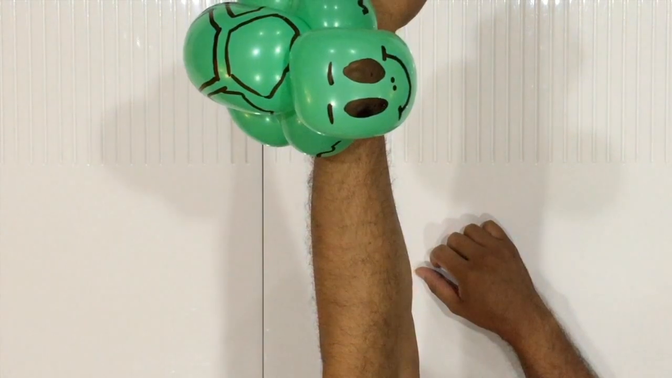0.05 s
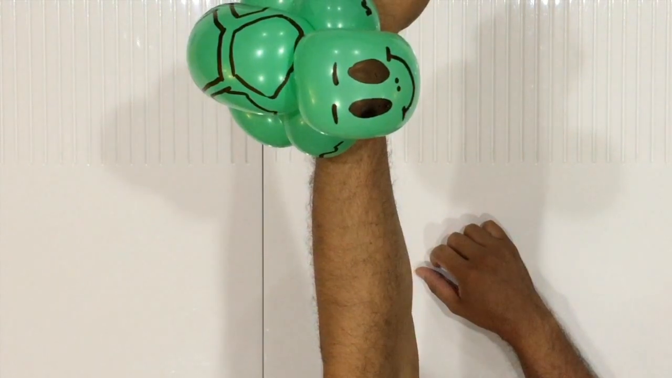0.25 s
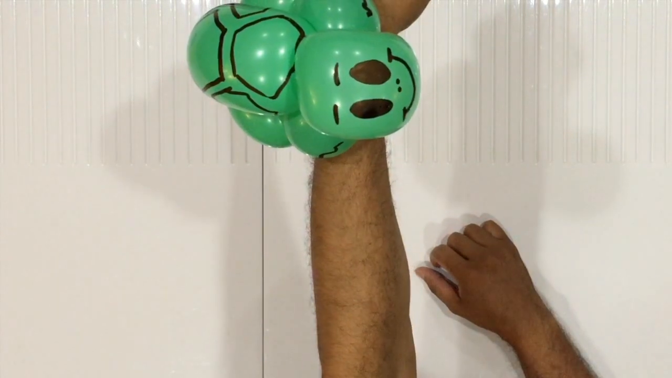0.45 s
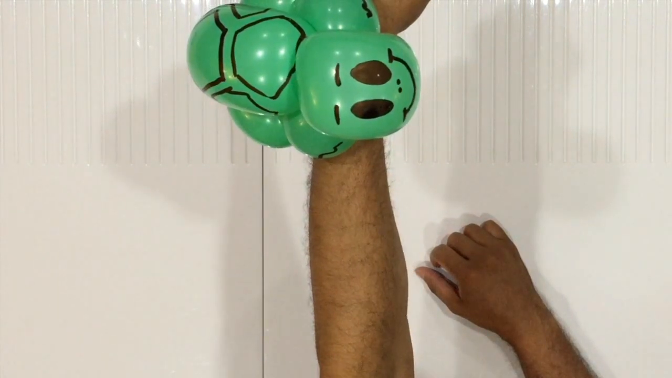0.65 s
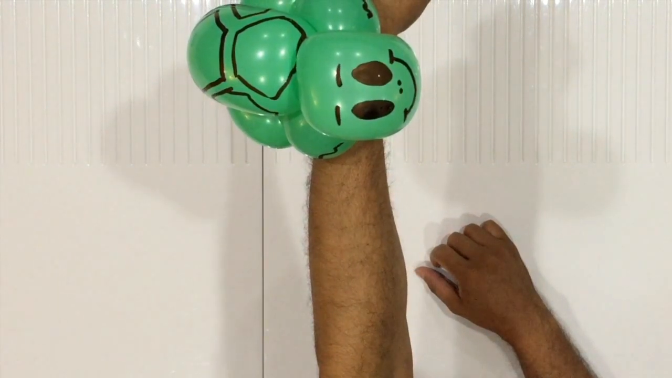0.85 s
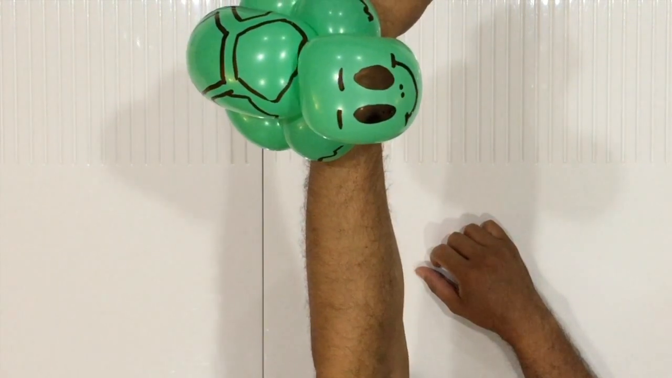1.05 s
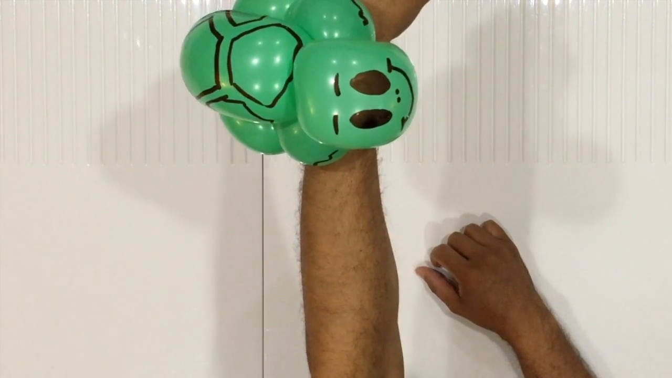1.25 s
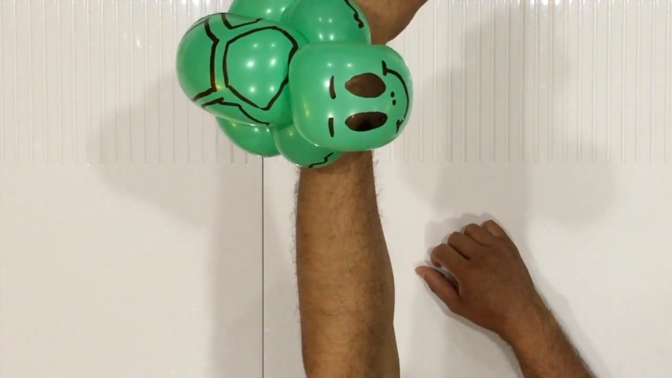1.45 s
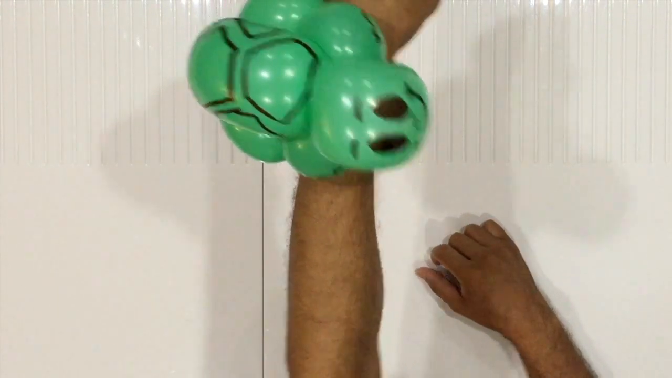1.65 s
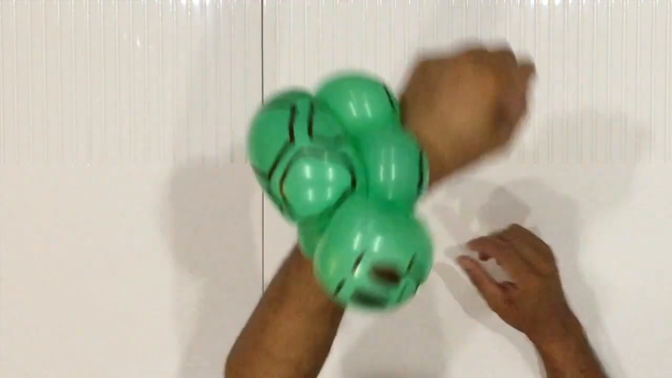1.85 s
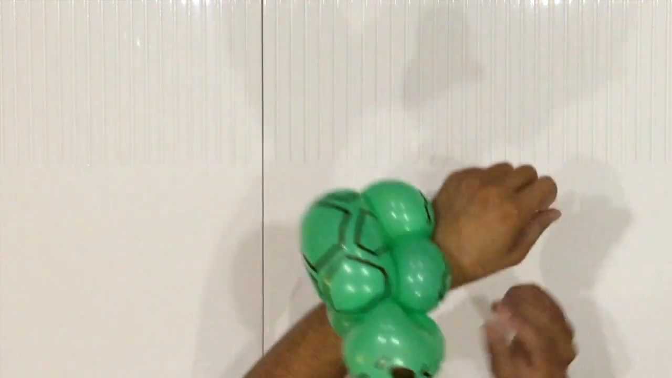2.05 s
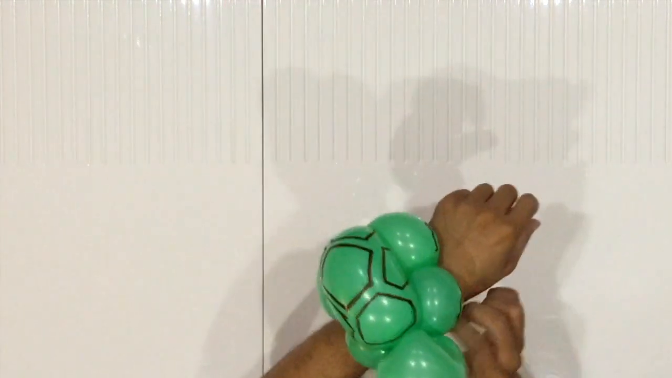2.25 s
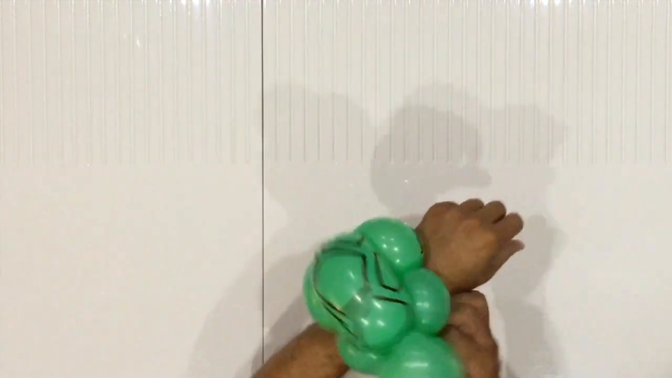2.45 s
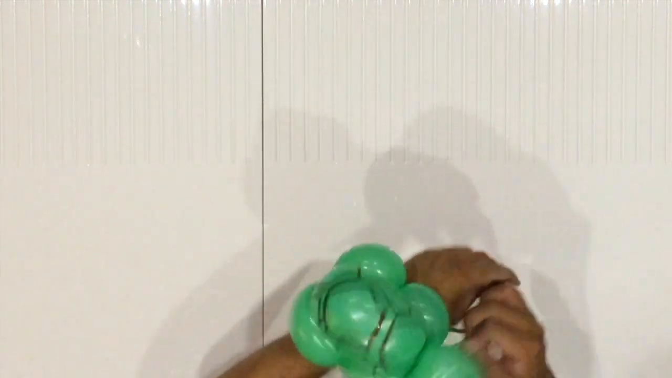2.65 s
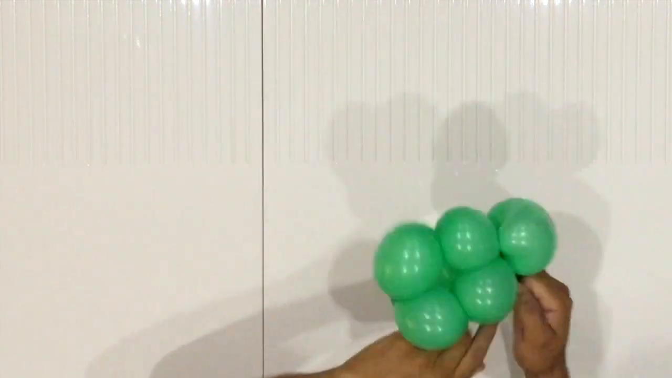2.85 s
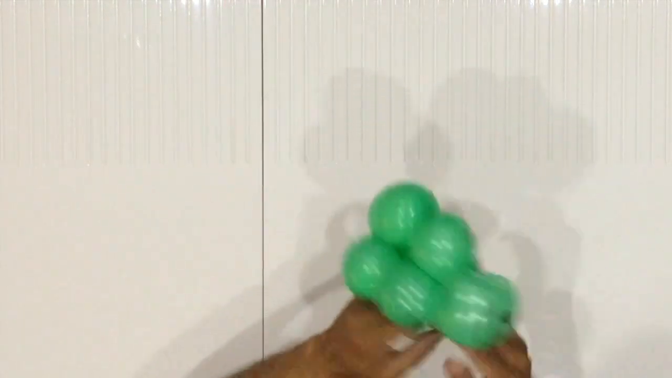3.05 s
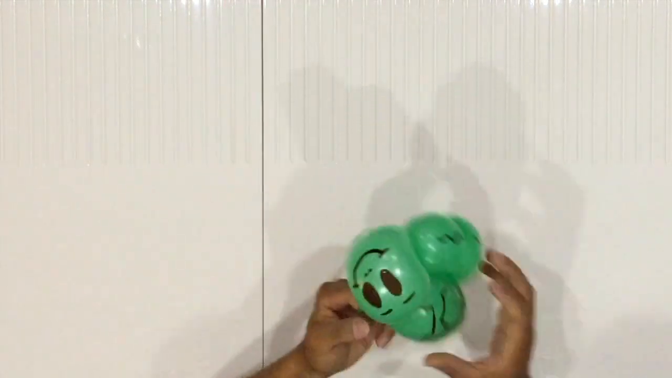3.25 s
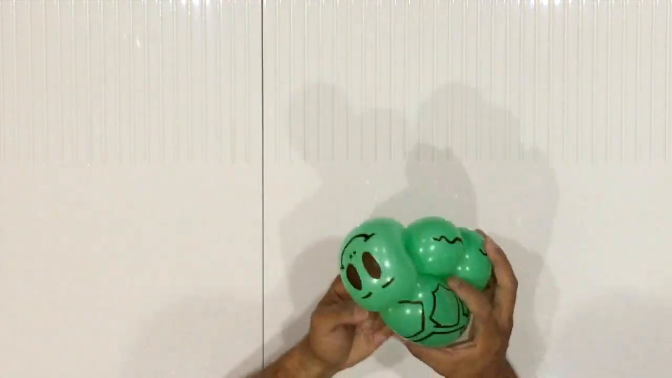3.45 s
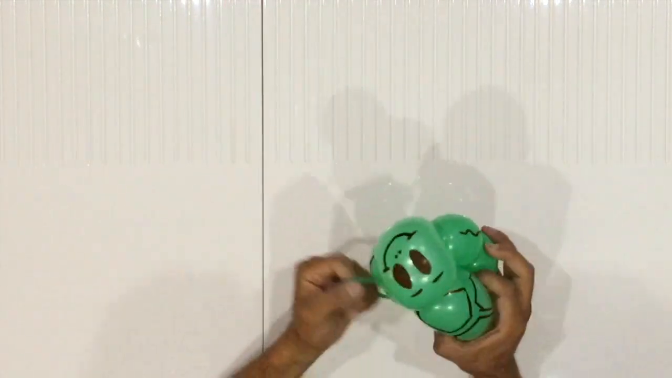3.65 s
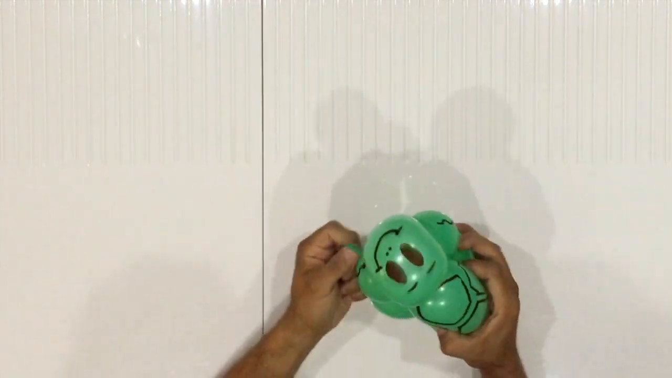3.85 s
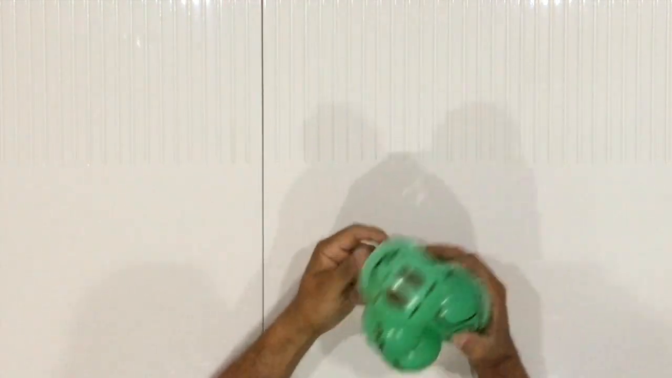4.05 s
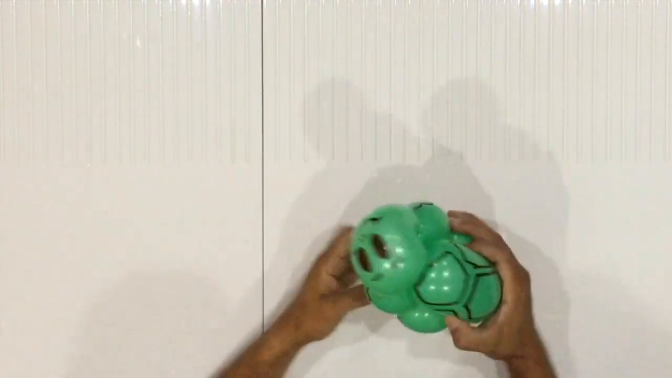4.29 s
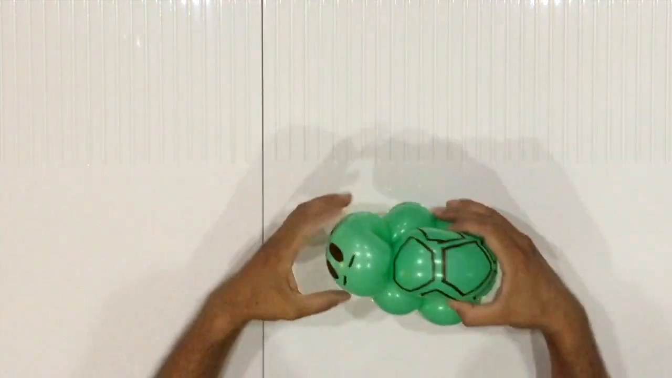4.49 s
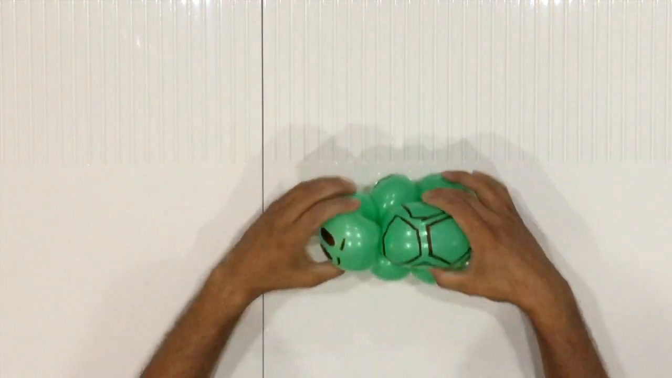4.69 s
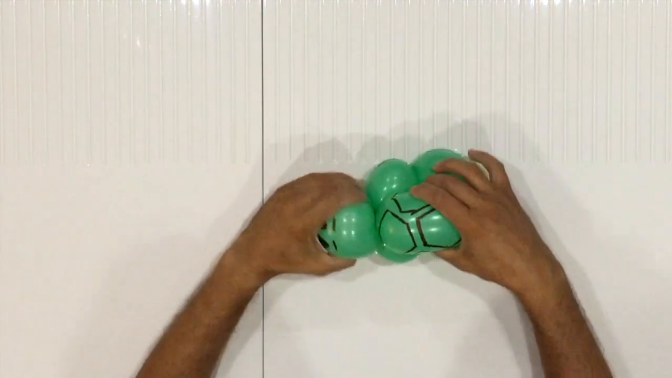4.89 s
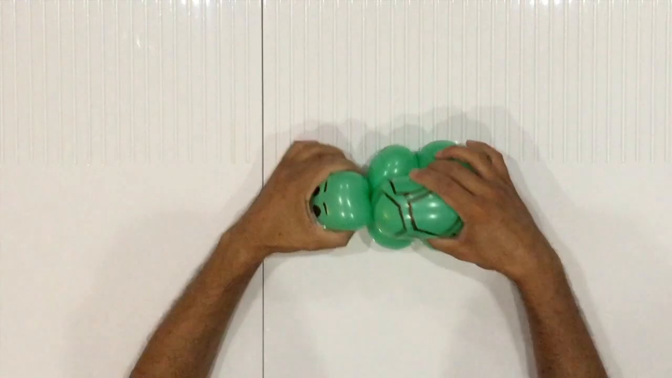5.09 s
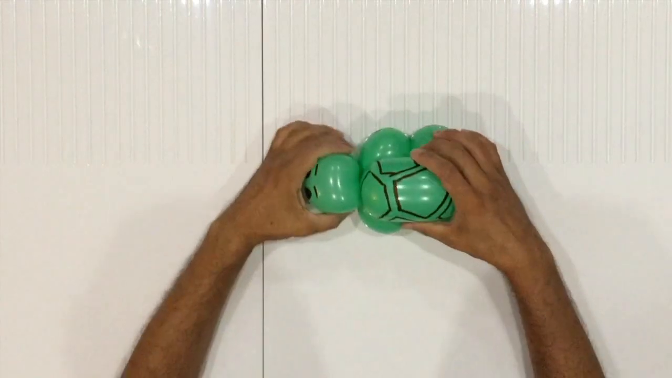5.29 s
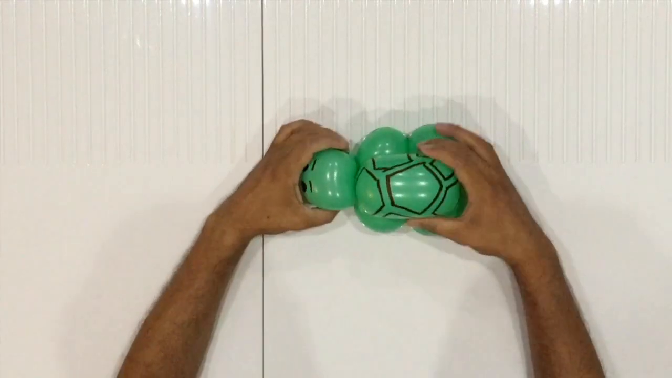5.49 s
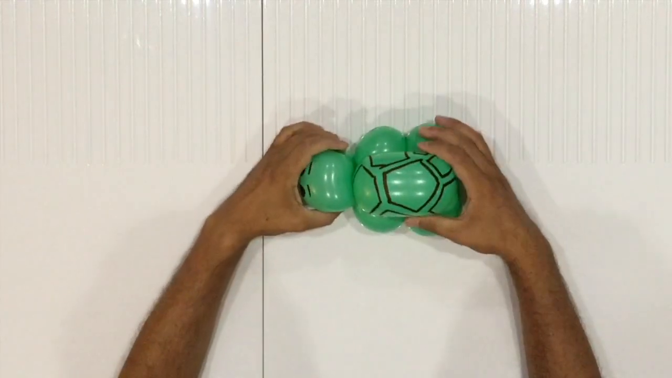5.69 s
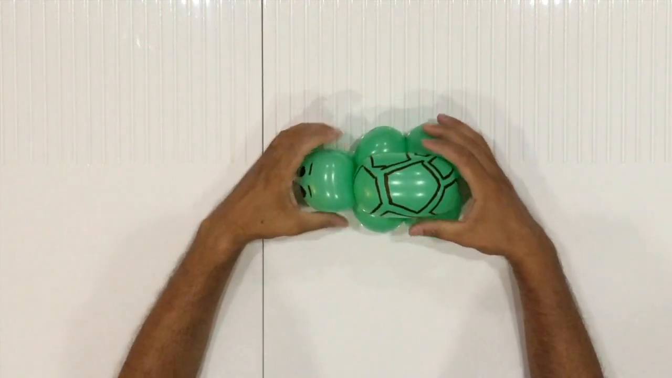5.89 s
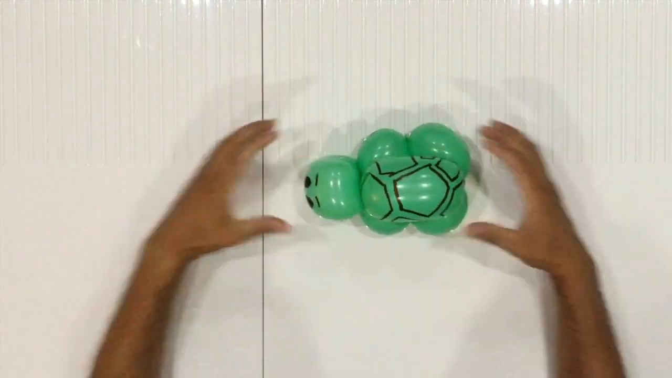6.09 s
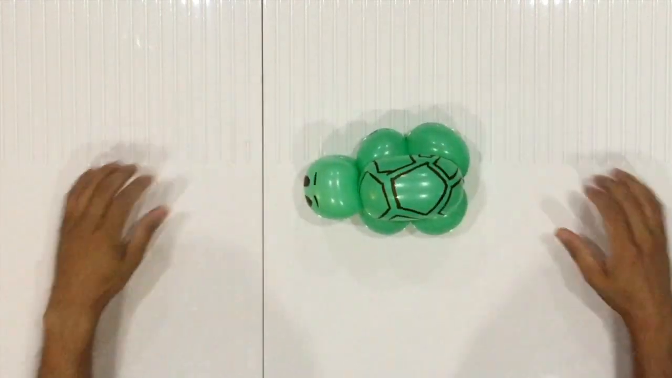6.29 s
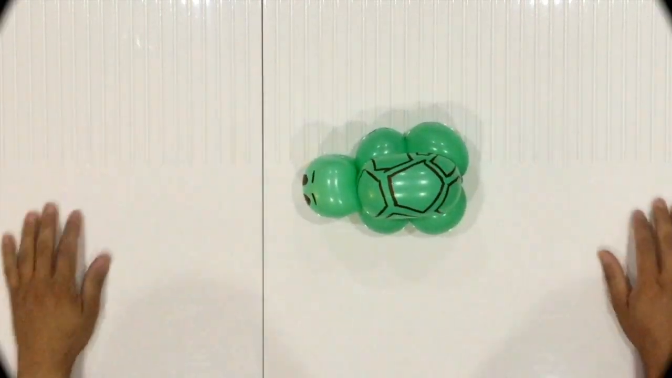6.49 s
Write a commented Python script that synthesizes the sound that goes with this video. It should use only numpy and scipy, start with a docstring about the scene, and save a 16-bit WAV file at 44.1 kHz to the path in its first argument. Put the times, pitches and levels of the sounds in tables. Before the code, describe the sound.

For the first 2.3 seconds there is only quiet room air with a low restless rumble, faint electrical hum and a very thin high whine. Then hands pull a latex balloon figure off a wrist: short, dry, stuttering rubs with hiss and crackle, growing busy from 2.5 to 3.1, with sharp pops around 2.7 and 2.9. It drops to faint touches near 3.3, then groaning, rasping strokes and small snaps build from 3.6. At about 3.99 one hard, hollow snap stands out as the loudest moment, followed by softer rubbing and a smaller pop at 4.35. After a quieter slide, a strong rub at 4.9 leads into brief, rough, mid-pitched squeaks, mostly rising, until 5.3. Another firm rub and squeak come near 5.55, then light touches end around 5.9, leaving room tone. Short, bright echoes of a small hard room surround the close handling.

```python
"""Quiet air, hum and a thin whine fill a small bare room, made from coloured noise and sine waves.
From 2.3 s a twisted latex balloon figure is pulled off a wrist and turned over: skin sticks and slips,
made of uneven kicks and noise; now and then the lobes snap past each other, hardest near 4 s (noise bursts).
Both hands close round it by 4.85 s; from then on short squeaks of nearly regular slips join the rubbing.
It is set down with the last light touches near 5.9 s. Echoes surround all sounds of the balloon."""
import sys
import numpy as np
from scipy import signal
from scipy.fft import rfft, irfft
from scipy.io import wavfile
from scipy.ndimage import uniform_filter1d

SR = 44100
rng = np.random.default_rng(int(sys.argv[2]) if len(sys.argv) > 2 else 0)


def store_wav(level_fs):
    """Save 16-bit WAV to argv[1]."""
    pcm = np.round(np.clip(np.atleast_2d(level_fs), -1, 1) * 32767)
    wavfile.write(sys.argv[1], SR, pcm.T.astype(np.int16))


N = 287967  # length of the scene in samples


def amp(db):
    """Decibels to gain."""
    return 10 ** (np.asarray(db) / 20)


def evened(x):
    """Scales a sound to an average strength (rms) of 1."""
    return x / np.sqrt(np.mean(x ** 2) + 1e-20)


def read(points, hz):
    """Reads a table between its points, on a log-frequency axis."""
    f, value = np.transpose(points)
    return np.interp(np.log(hz + 1), np.log(f + 1), value)


def drift(per_s):
    """Smooth random wandering of rms 1; a higher per_s wanders faster."""
    step = SR / (2 * per_s)
    knots = signal.resample_poly(rng.standard_normal(int(N / step) + 4), 8, 1)
    return evened(np.interp(np.arange(N) / step * 8, np.arange(len(knots)), knots))


# colour of the still room air: (f/Hz, relative level per Hz/dB)
AIR_COLOUR = [(24, -34), (40, -1.5), (120, -5.5), (150, -3), (235, -3.5), (266, -10), (294, -2.5),
              (368, -14), (438, -12.5), (472, -15.5), (606, -16), (2270, -26), (2920, -25), (4920, -32),
              (6000, -31.5), (8000, -36), (15500, -39.5)]
# faint electrical hum, before its level wavers: (f/Hz, level/dB)
HUM_TONES = [(96.9, -74.5), (199.2, -80), (290.7, -86.5), (613.7, -87)]
# thin electrical whine, before its level wavers: (f/Hz, level/dB)
WHINE_TONES = [(2945, -85.5), (3230, -94), (3488, -91)]


def background():
    """Soft air noise with a restless rumble, plus hum and whine whose level and phase waver."""
    hz, t = np.fft.rfftfreq(N, 1 / SR), np.arange(N) / SR
    air = evened(irfft(rfft(rng.standard_normal(N)) * amp(read(AIR_COLOUR, hz)), N))
    rumble = signal.sosfiltfilt(signal.butter(2, 400, fs=SR, output="sos"), air)
    air = air + rumble * (amp(1.7 * drift(7.8)) - 1)
    sound = amp(-66.5) * air
    for f, db in HUM_TONES:
        sound += amp(db + 2.1 * drift(4.9)) * np.sin(2 * np.pi * f * t + 1.1 * drift(1.3))
    for f, db in WHINE_TONES:
        level = amp(db + 1.4 * drift(4) + 2 * drift(0.82))
        sound += level * np.sin(2 * np.pi * f * t + .5 * drift(2.1))
    return sound


def touch(start, length, swell_db):
    """Gain of one contact: the skin takes hold quickly, swells or fades, and lets go more slowly."""
    attack_s, release_s = .003, .016  # time constants
    t = np.arange(N) / SR - start
    attack = (1 + np.tanh(t / (2 * attack_s) - 1)) / 2
    hold = amp(swell_db * (np.clip(t / length, 0, 1) - .5))
    return attack * hold * np.exp(-np.clip((t - length) / release_s, 0, 20))


# strokes of skin over latex: (start t/s, length t/s, level/dB, swell from start to end level/dB,
# groan re stroke level/dB, hiss re stroke level/dB, slips per second in mid-stroke f/Hz,
# pitch of the rubbed patch f/Hz, ring of the patch re stroke level/dB)
HAND_STROKES = [ (2.325, 0.04, -64, 14, 9, -11, 214, 730, 4),
                (2.372, 0.047, -52.5, -5, -9, -3, 240, 730, -7),
                (2.422, 0.11, -59.5, 3, -7, -2.5, 264, 1210, -12),
                (2.525, 0.12, -46.5, 8, -7.5, -2, 232, 1910, -4),
                (2.652, 0.088, -43, 1, -8, -4.5, 139, 1548, -11),
                (2.76, .025, -44, 1.5, -10, 4, 260, 3450, -1),
                (2.799, 0.1, -43.5, 2.5, -7, -2, 262, 1450, -2),
                (2.908, 0.064, -44, -2, -6, -4, 270, 2100, 1.5),
                (2.985, 0.099, -49, -4, -7.5, -3.5, 252, 2200, -9),
                (3.086, 0.069, -47, 8, 4.5, -6, 268, 1440, -7),
                (3.165, 0.1, -58.5, -11.5, -3, -21, 243, 530, -6),
                (3.27, 0.098, -67.5, -2.5, -7, -13, 196, 1481, -6),
                (3.371, 0.061, -57.5, -5, -0.5, -5.5, 247, 3400, -13),
                (3.441, 0.13, -59, 2.5, -2.5, 0.5, 260, 2987, -4),
                (3.568, .11, -52.5, 1.5, -8, 0, 272, 1698, -5),
                (3.681, 0.11, -47.5, 2.5, 7, -4.5, 237, 3433, -11),
                (3.785, 0.036, -46, 0.5, 5.5, -4.5, 186, 799.3, -11),
                (3.832, 0.24, -46.5, 4, 2, -8.5, 171, 1711, -11),
                (4.092, 0.11, -51, -2, -3.5, -5, 190, 2596, -11),
                (4.158, 0.03, -53, 0, -11, -2, 222, 3400, -1),
                (4.21, 0.063, -53.5, 0, 0, -3.5, 188, 1099, -0.5),
                (4.271, .045, -49.5, 1, -1, -0.5, 234, 3707, -0.5),
                (4.318, 0.11, -47.5, -3, 2, -6.5, 228, 600, -4),
                (4.427, 0.27, -55, -2, -5.5, -4.5, 188, 1100, -13),
                (4.622, .02, -57, -2, 0, -8.5, 190, 1150, 1),
                (4.68, 0.22, -58.5, -1, -13, 5, 360, 2844, -7),
                (4.903, 0.2, -40.5, 1, -15, -3.5, 299, 1898, -10),
                (5.12, 0.15, -47.5, 1.5, -5.5, -4.5, 276, 3000, -10),
                (5.282, 0.13, -53, -1, -13, -7.5, 222, 1108, -2.5),
                (5.402, 0.042, -50, 6, -6.5, -5, 228, 1190, -5.5),
                (5.463, .06, -59, -1.5, -19, -6.5, 260, 2400, -10),
                (5.525, 0.1, -39.5, -0.5, -10.5, -4.5, 168, 1272, -5),
                (5.64, 0.13, -56.5, -3, -10, -11.5, 160, 1400, -3),
                (5.779, 0.032, -48.5, -2.5, -10, -15, 205, 1680, -4),
                (5.826, 0.058, -61, 0.5, -6, -20, 163, 1110, 2),
                (5.885, 0.024, -59, -0.5, -8, -16, 189, 1250, 4),
                (5.913, 0.02, -62, -1.5, 2.5, -3, 118, 2250, 0), ]
SLIP_SAG = .32  # the slips slow by this share over a stroke, as the hand runs out of travel
UNSTEADY_DB, UNSTEADY_PER_S = 0.5, 18  # the pressure of the fingers wavers


def hands():
    """Gains of rasp, groan, hiss and patch; then slip rate and patch pitch, led by the strongest stroke."""
    t = np.arange(N) / SR
    rasp, groan, hiss, patch, rate, pitch = np.zeros((6, N))
    for start, length, db, swell_db, groan_db, hiss_db, per_s, patch_hz, patch_db in HAND_STROKES:
        power = (amp(db) * touch(start, length, swell_db)) ** 2
        travel = np.clip((t - start) / length, 0, 1)
        rasp += power
        groan += power * amp(groan_db) ** 2
        hiss += power * amp(hiss_db) ** 2
        patch += power * amp(patch_db) ** 2
        # rate and pitch are averages weighted by the power of each stroke
        pitch += power * patch_hz
        rate += power * per_s * (1 - SLIP_SAG * (travel - .5))
    pressure = amp(UNSTEADY_DB * drift(UNSTEADY_PER_S))
    rate = np.where(rasp > 0, rate / (rasp + 1e-30), 200)
    pitch = np.where(rasp > 0, pitch / (rasp + 1e-30), 700)
    return *(pressure * np.sqrt([rasp, groan, hiss, patch])), rate, pitch


# both hands close round the figure: (t/s, grip from 0 to 1)
HAND_GRIP = [(4.45, 0), (4.85, 1)]


def grip_curve():
    """How firmly the hands hold the figure at every sample, drawn straight between the table's rows."""
    s, grip = np.transpose(HAND_GRIP)
    return np.interp(np.arange(N) / SR, s, grip)


def ring(x, colour, modes=(), size=16384):
    """Filter of unit energy that never rings ahead: a broad colour with resonances standing out of it."""
    hz = np.fft.rfftfreq(size, 1 / SR)
    lift = np.ones(len(hz))
    for centre, width, db in modes:
        lift += (amp(abs(db)) ** 2 - 1) / (1 + (2 * (hz - centre) / width) ** 2)
    log_gain = np.log(amp(read(colour, hz)) * np.sqrt(lift))
    # minimum phase: the response starts at once and dies away
    circle = np.concatenate([log_gain, log_gain[-2:0:-1]])
    taps = np.fft.ifft(np.exp(np.conj(signal.hilbert(circle)))).real[:size // 2]
    return signal.oaconvolve(x, taps / np.linalg.norm(taps))[:N]


def resonate(x, hz, width):
    """A resonance, width in Hz, that follows the moving pitch hz."""
    turn = np.exp(2j * np.pi * np.cumsum(hz) / SR)
    r = np.exp(-np.pi * width / SR)
    return 2 * (turn * signal.lfilter([1 - r], [1, -r], x / turn)).real


def steadied(x, size=1800):
    """Evens out the power over a few slips, so that the hand sets the level."""
    power = uniform_filter1d(uniform_filter1d(x ** 2, size), size)
    return x / np.sqrt(abs(power) + 1e-12)


def slips(rate, jitter, uneven_db):
    """Stick-slip: one kick each time the rubber lets go, uneven in spacing and size."""
    turns = np.cumsum(rate * np.exp(jitter * drift(120))) / SR
    kicks = np.diff(np.floor(turns), prepend=0) * amp(uneven_db * drift(160))
    return steadied(kicks)


def scrape(kicks, decay_s):
    """Each slip drags skin over rubber for an instant: a tiny burst of noise."""
    power = signal.lfilter([1], [1, -np.exp(-2 / (decay_s * SR))], kicks ** 2)
    return evened(np.sqrt(power) * rng.standard_normal(N))


def dispersed(kicks, spread_s, size=512):
    """Treble outruns bass across the stretched skin, so each kick arrives as a short downward chirp."""
    hz = np.fft.rfftfreq(size, 1 / SR)
    delay = spread_s / np.sqrt(1 + hz / 500)
    chirp = irfft(np.exp(-2j * np.pi * np.cumsum(delay) * hz[1]), size)
    return signal.oaconvolve(kicks, chirp)[:N]


# resonances of the loose balloon lobes, with steady low modes of the room among them, also heard in the snaps:
# (f/Hz, width f/Hz, lift level/dB)
LOOSE_RESONANCES = [(168, 12, 5), (218, 14, 4), (243, 14, 6.5), (270, 14, 3), (331, 26, 8), (378, 20, 3.5),
                    (428, 16, 5.5), (461, 14, 5), (527, 18, 8), (566, 18, 6), (632, 24, 7), (737, 24, 4),
                    (828, 36, 6), (938, 36, 3.5), (1036, 30, 6), (1168, 30, 3.5), (1376, 40, 2.5),
                    (1461, 34, 4.5), (1668, 40, 3.5), (1950, 70, 4), (2180, 60, 4), (2360, 60, 4),
                    (4050, 400, 4.5), (5530, 400, 2.5)]
# resonances of the lobes squeezed between the palms: (f/Hz, width f/Hz, lift level/dB, sign ignored)
SQUEEZED_LOBES = [(820, 71, 6), (946.3, 64.6, 8), (1032.3, 41.9, 1), (1163, 31, 5.5), (1272, 42.5, 2),
                  (1379.3, 64, 1), (1710, 67, 8), (1744.7, 40.8, 11), (2881, 114, 5), (3511, 129, 5),
                  (3779, 171, 9.5), (4594, 220, -7)]
# colour of the slow groan: (f/Hz, relative level per Hz/dB)
GROAN_COLOUR = [(40, -27.5), (80, -12.5), (200, 1.5), (400, -3), (600, 5), (750, -1), (1100, -17),
                (3000, -37.5)]
# colour of the rasp, and of the ringing skin in the snaps: (f/Hz, relative level per Hz/dB)
RASP_COLOUR = [(100, -32.5), (400, -8.5), (750, 3), (1100, 6), (2200, 2), (3000, -3.5), (4300, -8.5),
               (7000, -31.5), (15000, -43)]
# colour of the rasp under a firm grip: (f/Hz, relative level per Hz/dB)
GRIPPED_COLOUR = [(100, -27.5), (400, 1), (750, 2), (1200, 6.5), (1800, -2), (2500, -4.5), (4300, -8.5),
                  (7000, -25), (15000, -31.5)]
# colour of the sliding skin's hiss: (f/Hz, relative level per Hz/dB)
HISS_COLOUR = [(500, -17.5), (2000, 1), (3500, -1), (6200, 2), (7800, -4.5), (9500, -2.5), (10400, -8.5),
               (11800, -8), (15500, -8)]
SWINGS_PER_SLIP = 1.81  # the groan's pitch over the slip rate
PATCH_WANDER, PATCH_WIDTH_HZ = .1, 730  # the patch rings broadly, and its pitch wanders with the fingers


def rubbing(rasp_gain, groan_gain, hiss_gain, patch_gain, rate, patch_hz):
    """Hands creep over the latex: rasp, groan, hiss and patch ring, all from the same contact."""
    grip = grip_curve()
    fast = slips(rate, jitter=.45, uneven_db=-1.0)
    slow = slips(rate * .4, jitter=.6, uneven_db=2.0)
    # the rasp takes its colour from the loose resonances or the squeezed lobes
    drive = dispersed(fast, spread_s=0.00299)
    drive = drive + 0.35 * scrape(fast, decay_s=0.0019) + .5 * scrape(slow, decay_s=0.0047)
    drive = evened(drive)
    loose = steadied(ring(drive, RASP_COLOUR, LOOSE_RESONANCES))
    gripped = steadied(ring(drive, GRIPPED_COLOUR, SQUEEZED_LOBES))
    rasp = amp(-1.5) * rasp_gain * ((1 - grip) * loose + grip * gripped)
    # whole lobes judder more slowly and swing at their own pitch
    swing = evened(resonate(slow, rate * SWINGS_PER_SLIP, width=160)) + 0.44 * slow
    groan = amp(-0.5) * groan_gain * steadied(ring(swing, GROAN_COLOUR, LOOSE_RESONANCES))
    # every slip also spits a little hiss, over a steady slide
    grit = scrape(fast, decay_s=0.0013) + 0.8 * scrape(slow, decay_s=0.0014)
    grit = evened(grit + 0.85 * rng.standard_normal(N))
    hiss = amp(1.58) * hiss_gain * ring(grit, HISS_COLOUR, LOOSE_RESONANCES)
    # the patch under the finger rings at each catch
    pitch = patch_hz * np.exp(PATCH_WANDER * drift(20))
    catches = evened(slow) + 0.6 * drive
    patch = resonate(resonate(catches, pitch, PATCH_WIDTH_HZ), pitch, PATCH_WIDTH_HZ)
    return rasp + groan + hiss + patch_gain * steadied(patch)


TWANG_STRETCH = .12  # the stretched rubber starts sharp by this share and relaxes


def twang(hz, decay_s, size=4096):
    """A patch of rubber swings, swelling to 1 and dying away as its pitch settles."""
    t = np.arange(size) / SR
    age = t / max(decay_s, .0002)
    turns = hz * (t + TWANG_STRETCH * decay_s * (1 - np.exp(-age)))
    return np.sin(2 * np.pi * turns) * age * np.exp(1 - age)


# the rate is an upper guide, thinned by the clusters; sizes vary upward from 0 to twice the spread
GRAINS_PER_S, GRAIN_LOW_HZ, GRAIN_HIGH_HZ, GRAIN_CYCLES, GRAIN_SPREAD_DB = 260, 900, 7500, 1.1, 4.5
# how often clusters change, swing of the grain rate, wander and width of their pitch (natural log)
CLUSTERS_PER_S, CLUSTER_DB, CLUSTER_WANDER, CLUSTER_WIDTH = 35, 5, .5, .5
GRAIN_DB, GRAIN_GRIP_DB = -3.5, -6  # level re the stroke, and its change under the grip


def grains(rasp_gain, count=32):
    """Tiny patches let go in clusters under the sliding skin, each cluster around its own pitch."""
    out = np.zeros(N)
    crowding = amp(CLUSTER_DB * drift(CLUSTERS_PER_S))
    middle = np.log(GRAIN_LOW_HZ * GRAIN_HIGH_HZ) / 2
    centre = middle + CLUSTER_WANDER * drift(CLUSTERS_PER_S)
    for hz in np.geomspace(GRAIN_LOW_HZ, GRAIN_HIGH_HZ, count):
        size = amp(GRAIN_SPREAD_DB * np.minimum(rng.exponential(1, N), 2))
        near = np.exp(-((np.log(hz) - centre) / CLUSTER_WIDTH) ** 2)
        chance = near * crowding * GRAINS_PER_S / count / SR
        kicks = size * (rng.random(N) < chance)
        out += signal.oaconvolve(kicks, twang(hz, GRAIN_CYCLES / hz))[:N]
    return amp(GRAIN_DB + GRAIN_GRIP_DB * grip_curve()) * rasp_gain * evened(out)


def whitened(x, width_hz):
    """Levels the broad humps of a short random response, keeping its course in time; unit energy."""
    z = rfft(x, 2 * len(x))
    bins = max(int(width_hz * 2 * len(x) / SR), 1)
    even = irfft(z / np.sqrt(abs(uniform_filter1d(abs(z) ** 2, bins)) + 1e-12))[:len(x)]
    return even / np.linalg.norm(even)


def burst(length_s, rise_s, fall=0.98, size=4096):
    """A sudden release of unit energy: the membrane shudders and dies, more abruptly for a higher fall."""
    t = np.arange(size) / SR
    decay = np.exp(-(t / max(length_s, .0005)) ** fall)
    shudder = rng.standard_normal(size) * decay * (1 - np.exp(-t / rise_s))
    return whitened(shudder, width_hz=77)


# snaps of the rubber: (t/s, relative level/dB, crack re that level/dB, length of the jump t/s)
LOBE_SNAPS = [ (2.378, -45.5, -8, 0.0036), (2.529, -46, 1.5, 0.0027), (2.601, -37, -9, 0.0054),
              (2.663, -42, 9, 0.0054), (2.685, -34.5, 5, 0.0055), (2.7178, -32, -1.5, 0.003),
              (2.732, -36, 4.5, 0.0037), (2.7452, -30, 3, 0.0048), (2.855, -45.5, 16.5, 0.0026),
              (2.8866, -27, 1.5, 0.0051), (2.9012, -23.5, 8.5, 0.0042), (3.091, -42, 10, 0.0045),
              (3.119, -40.5, 9, 0.0064), (2.978, -45, 5, .003), (2.989, -48, 4, .003),
              (3.017, -48, 3, 0.0031), (3.302, -51.5, 5.5, 0.0029), (3.3343, -59, 7, 0.0024),
              (3.377, -49.5, 1.5, 0.0059), (3.4391, -45.5, -0.5, 0.0038), (3.572, -43, 8.5, 0.0037),
              (3.632, -48, 2, 0.0043), (3.652, -40, 0, 0.003), (3.675, -33.5, -2, 0.0042),
              (3.698, -38.5, 6, 0.0056), (3.731, -37.5, 8, 0.0052), (3.748, -39.5, 3, 0.0067),
              (3.794, -39, 9, 0.0036), (3.868, -36.5, 9, 0.0033), (3.884, -40.5, 3.5, 0.0042),
              (3.93, -35, 2.5, 0.0036), (3.959, -40.5, 4, 0.0038), (3.963, -33, 10.5, 0.0048),
              (3.972, -28.5, 5, 0.0092), (3.9873, -16.5, 2.5, 0.0056), (3.9924, -26, 4.5, 0.0035),
              (4.015, -28.5, -7.5, 0.0063), (4.076, -45, -11, 0.0042), (4.319, -42.5, 6, 0.0068),
              (4.351, -36, 3, 0.0039), (4.355, -28.5, -5, 0.003), (4.598, -44, 3.5, 0.0079),
              (4.9143, -43.5, 11, 0.0055), (5.289, -54, 5, .003), (5.342, -40.5, 4, 0.0026),
              (5.421, -51, 6, .003), (5.441, -49, 5, 0.0029), (5.5291, -40, 8.5, 0.003), ]
# colour of a snap's thump: (f/Hz, relative level per Hz/dB)
THUMP_COLOUR = [(45, -27), (65, -8.5), (100, 0), (160, -10.5), (260, -2), (600, -0.5), (900, -6),
                (2500, -48.5)]
# colour of a snap's crack: (f/Hz, relative level per Hz/dB)
CRACK_COLOUR = [(700, -19.5), (2500, 2.5), (4000, 2), (6500, 3), (8500, -2), (10400, -5.5), (12000, -5),
                (15500, -10.5)]
# only hard snaps move the air inside: dB of thump per dB of snap, even at this level
FULL_THUMP_DB, THUMP_GROWTH = -23.5, 1.13


def snaps(rasp_gain):
    """Lobes jump past each other: a crack, a ring of the skin and a thump of the air inside."""
    crack, skin, thump = np.zeros((3, N + SR))
    for s, level_db, crack_db, length in list(LOBE_SNAPS) + crackle(rasp_gain):
        thump_db = FULL_THUMP_DB + THUMP_GROWTH * (level_db - FULL_THUMP_DB)
        layers = ((crack, level_db + crack_db, burst(length * 0.68, rise_s=0.0045, fall=1.5)),
                  (skin, level_db, burst(length * 1.2, rise_s=0.00036, fall=0.85)),
                  (thump, thump_db, burst(length * 2.0, rise_s=0.0014)))
        start = round(s * SR)
        for track, db, sound in layers:
            track[start:start + len(sound)] += amp(db) * sound
    cracks = amp(15.0) * ring(crack, CRACK_COLOUR, LOOSE_RESONANCES)
    skins = amp(23.5) * ring(skin, RASP_COLOUR, LOOSE_RESONANCES)
    thumps = amp(21.0) * ring(thump, THUMP_COLOUR, LOOSE_RESONANCES)
    return cracks + skins + thumps


CRACKLE_DB, CRACKLE_SPREAD_DB = -2, 3.5  # level of the small snaps re the stroke's, and its spread
CRACKLE_CRACK_DB, CRACKLE_S = -4, 0.0035  # their crack re their level, and their length


def crackle(rasp_gain, count=70):
    """Small snaps at chance moments, as strong as the rubbing allows; rows like LOBE_SNAPS."""
    first, last = LOBE_SNAPS[0][0], LOBE_SNAPS[-1][0]
    rows = []
    for when, size in rng.random((count, 2)):
        s = first + when * (last - first)
        stroke_db = 20 * np.log10(rasp_gain[round(s * SR)] + 1e-9)
        level_db = stroke_db + CRACKLE_DB + CRACKLE_SPREAD_DB * (2 * size - 1)
        rows.append((s, level_db, CRACKLE_CRACK_DB, CRACKLE_S))
    return rows


# a lobe or a patch of skin springs free and swings: (t/s, settled pitch f/Hz, peak level/dB, decay t/s)
FREE_SWINGS = [(2.659, 223, -39, 0.0066), (2.746, 250.4, -40, 0.0045), (2.887, 586, -25, 0.0026),
               (2.903, 530.2, -24, 0.0061), (3.091, 513, -32.5, 0.003), (3.133, 248, -45, 0.0067),
               (3.143, 520, -34.5, 0.0034), (3.572, 476, -41, 0.0017), (3.748, 402, -35, .004),
               (3.808, 470, -36.5, 0.0034), (3.93, 5502, -37.5, .0016), (3.988, 324.6, -20.5, 0.0042),
               (3.989, 1036, -20, 0.0017), (3.99, 465, -25, .004), (3.992, 250.6, -31, .004),
               (4.3556, 1054, -23.5, 0.0012), (4.356, 340, -34, .003), (4.357, 622, -31, 0.0029),
               (5.935, 215, -61, 0.0087)]


def twangs():
    """Released lobes swing low; a patch caught by a fingertip whistles."""
    out = np.zeros(N + SR)
    for s, hz, db, decay_s in FREE_SWINGS:
        sound = amp(db) * twang(hz, decay_s)
        out[round(s * SR):][:len(sound)] += sound
    return out[:N]


# under a firm grip the slips lock into squeaks:
# (start t/s, length t/s, level/dB, pitch in the middle f/Hz, climb in Hz per s)
GRIP_SQUEAKS = [(4.955, 0.087, -41, 388, 399), (5.052, 0.051, -35.5, 432, 700.5),
                (5.16, 0.055, -45, 415.1, 99.5), (5.235, .035, -48.5, 420, 0), (5.297, 0.03, -48, 419, 2),
                (5.575, .052, -47, 429.4, 100)]
# colour of the squeaks: (f/Hz, relative level per Hz/dB)
SQUEAK_TONE = [(200, -22), (400, -4), (550, -5), (780, 7), (1150, -1.5), (1380, 3.5), (1750, -6),
               (2600, -26), (4000, -22), (6000, -26), (12000, -50)]


def squeak():
    """Nearly regular slips make a rough stack of harmonics, swelling and mostly climbing in pitch."""
    t = np.arange(N) / SR
    gain, pitch = np.zeros(N), np.full(N, float(GRIP_SQUEAKS[0][-2]))
    for start, length, db, hz, climb in GRIP_SQUEAKS:
        gain += amp(db) * touch(start, length, swell_db=3)
        gliding = hz + climb * (np.minimum(t - start, length) - length / 2)
        pitch = np.where(t < start, pitch, gliding)
    kicks = slips(pitch, jitter=.03, uneven_db=4)
    return gain * steadied(ring(dispersed(kicks, spread_s=0.00288), SQUEAK_TONE))


# time in which the room's echoes fall by 60 dB: (f/Hz, t/s)
ROOM_DECAY = [(100, .36), (300, 0.35), (800, 0.32), (2000, 0.49), (5000, 0.34), (13000, 0.27)]


def echoes(wet_db, table_db, size=32768):
    """Quick reflections from the table top and arms, then the tail of a small hard room."""
    t = np.arange(size) / SR
    taps = rng.choice([-1., 1.], size) * (rng.random(size) < 5000 / SR) * (t > .007)
    # each frequency of the tail dies at its own speed
    hz, at, z = signal.stft(taps, SR, nperseg=256)
    fade = amp(-60 * at / read(ROOM_DECAY, hz)[:, None])
    tail = signal.istft(z * fade, SR, nperseg=256)[1][:size]
    early = rng.standard_normal(size) * (rng.random(size) < 3000 / SR)
    early = early * (t > .003) * np.exp(-t / .009)
    return amp(wet_db) * whitened(tail, width_hz=180) + amp(table_db) * whitened(early, width_hz=43)


# colour that the surfaces give to the echoes: (f/Hz, level/dB)
WALL_COLOUR = [(100, -0.5), (600, -5), (3000, -1), (6000, -4), (10000, -3.5), (15000, -4)]


def room(x, wet_db, table_db, moves_per_s, count=10):
    """The figure keeps turning, so one pattern of reflections gives way to the next, in a cycle of count."""
    place = np.arange(N) / SR * moves_per_s
    hz = np.fft.rfftfreq(N, 1 / SR)
    coloured = irfft(rfft(x) * amp(read(WALL_COLOUR, hz)), N)
    out = x.copy()
    for k in range(count):
        away = abs((place - k + count / 2) % count - count / 2)
        share = np.cos(np.pi / 2 * np.minimum(away, 1))
        out += signal.oaconvolve(coloured * share, echoes(wet_db, table_db))[:N]
    return out / np.sqrt(1 + amp(wet_db) ** 2 + amp(table_db) ** 2)


def scene():
    """The balloon in its room."""
    rasp_gain, *contact = hands()
    balloon = rubbing(rasp_gain, *contact) + grains(rasp_gain) + snaps(rasp_gain)
    balloon = balloon + twangs() + squeak()
    return (room(balloon, wet_db=-4.5, table_db=-3.5, moves_per_s=13) + background())[None]


def record(dry):
    """The microphone sheds deep bass; a steep filter ends the treble near 15.9 kHz."""
    thinned = signal.sosfilt(signal.butter(4, 40, "highpass", fs=SR, output="sos"), dry)
    treble_limit = signal.firwin(511, 15900, window=("kaiser", 9), fs=SR)
    return signal.oaconvolve(thinned, treble_limit[None], "same")


dry = scene()
out = record(dry)
store_wav(out)
```